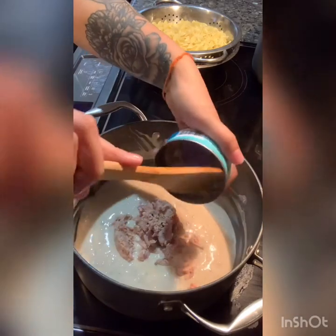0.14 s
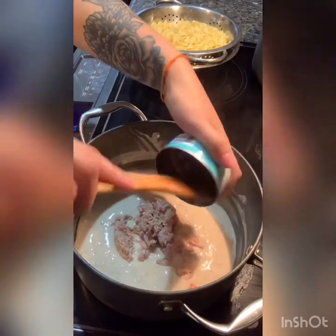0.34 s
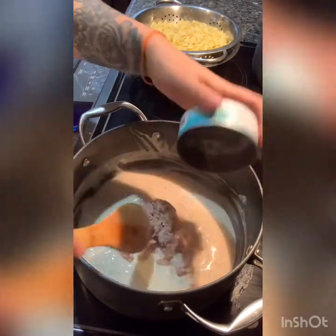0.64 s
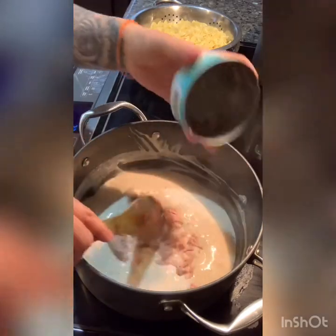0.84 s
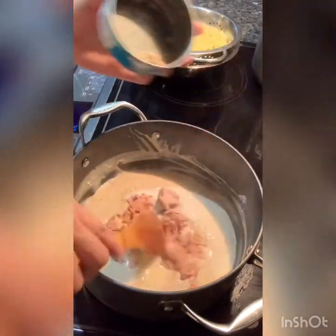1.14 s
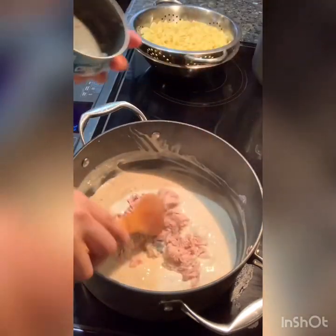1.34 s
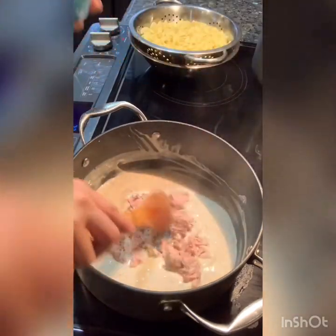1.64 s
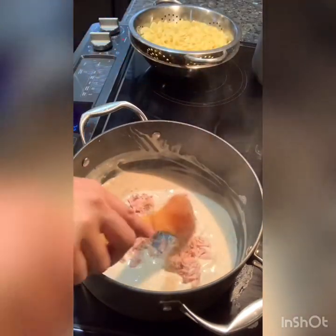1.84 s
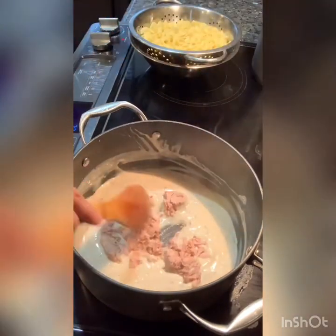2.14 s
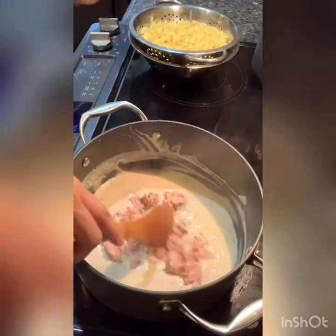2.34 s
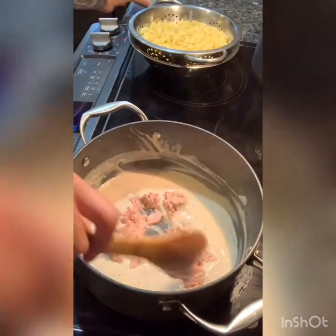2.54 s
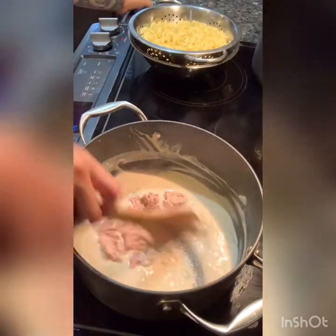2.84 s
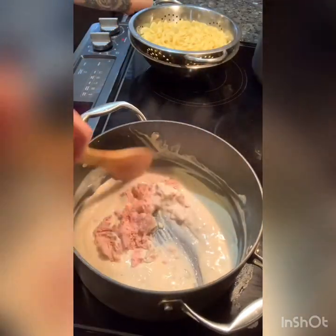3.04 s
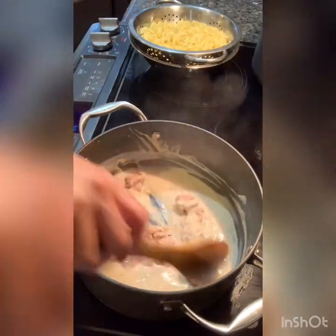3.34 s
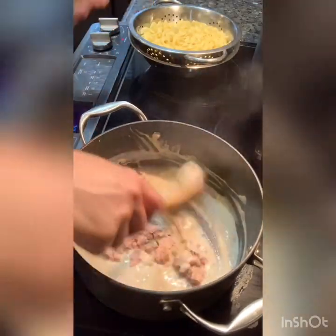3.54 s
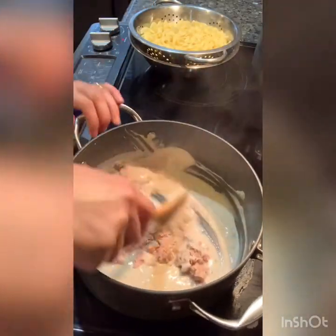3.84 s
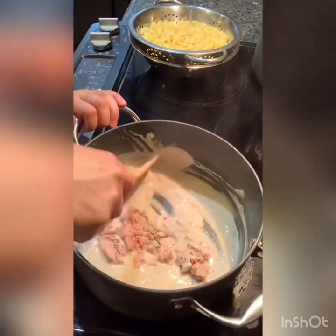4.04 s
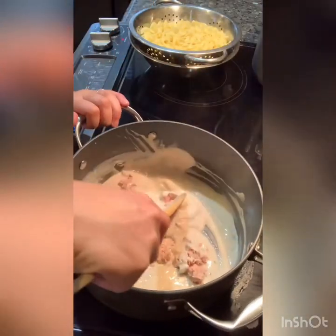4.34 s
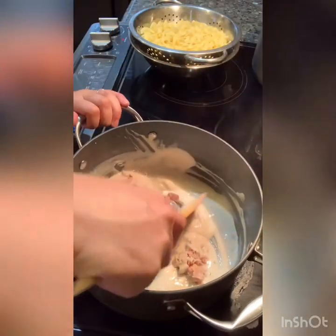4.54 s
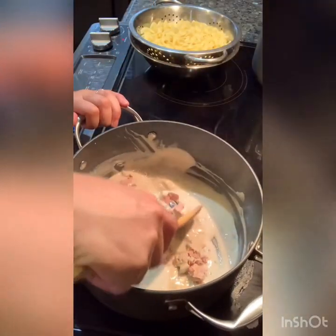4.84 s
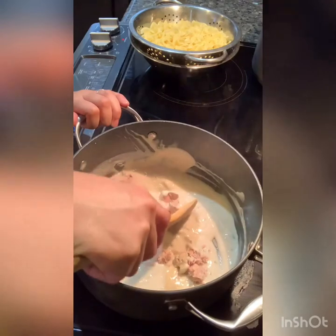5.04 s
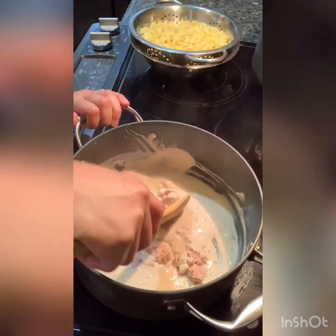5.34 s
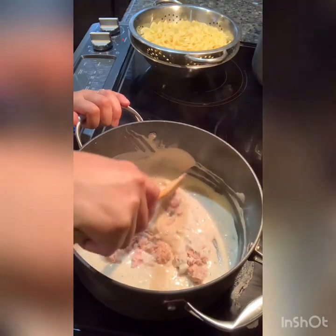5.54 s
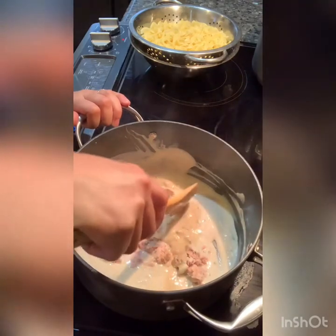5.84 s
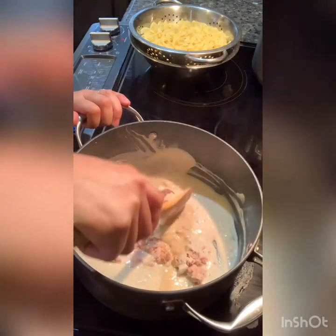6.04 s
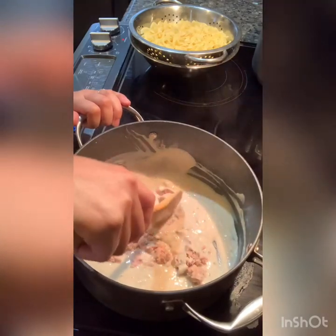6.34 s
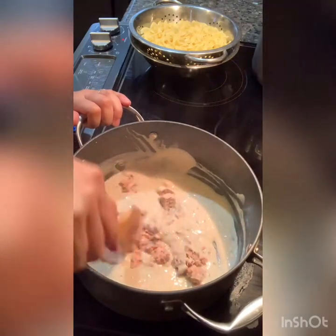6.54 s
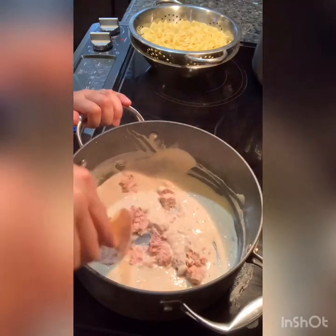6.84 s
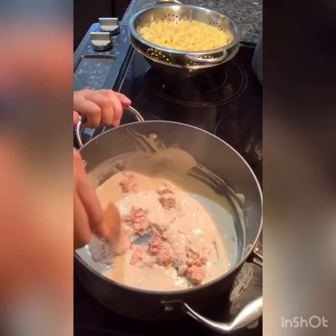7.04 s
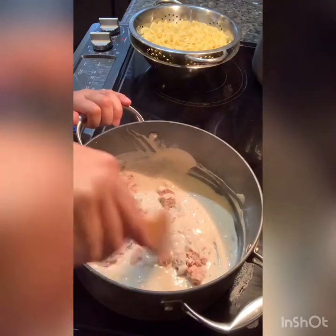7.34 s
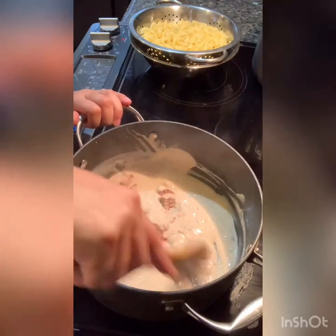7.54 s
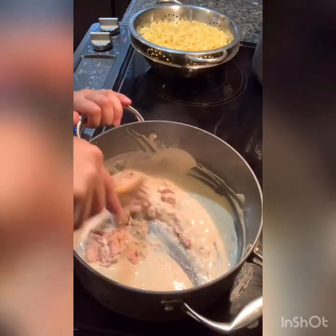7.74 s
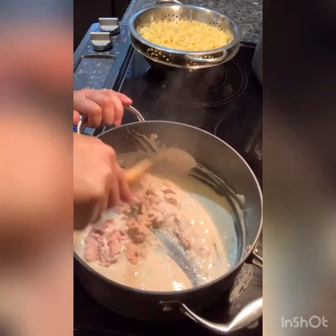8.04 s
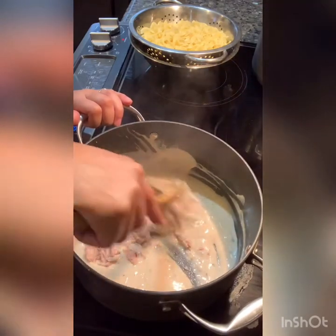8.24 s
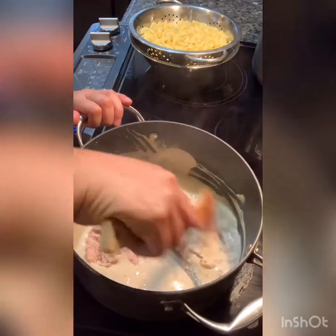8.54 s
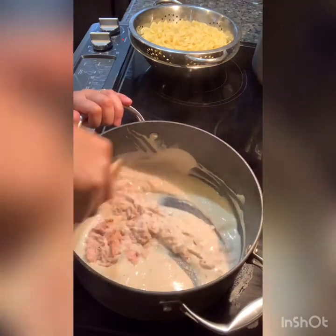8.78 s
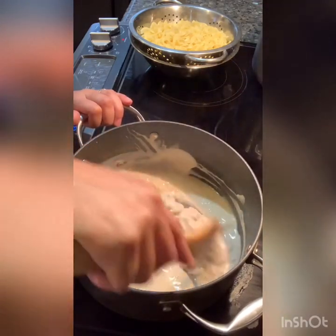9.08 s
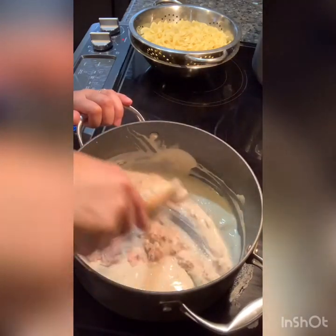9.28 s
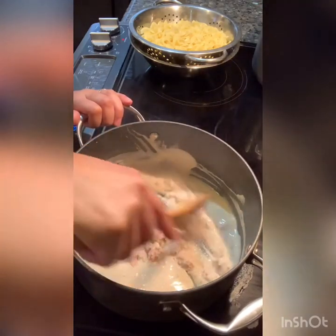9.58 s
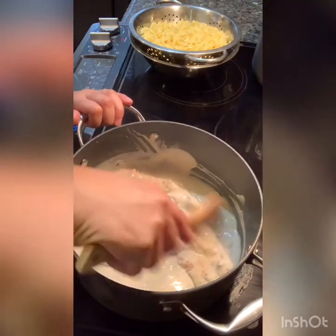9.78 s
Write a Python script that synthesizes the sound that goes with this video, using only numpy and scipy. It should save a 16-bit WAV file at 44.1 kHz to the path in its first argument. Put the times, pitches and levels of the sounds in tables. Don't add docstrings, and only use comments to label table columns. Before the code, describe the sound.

Dull woody chops ring briefly in a sauce-filled steel pot, with wet scraping strokes, a small tin clattering down, and faint spitting fat.

```python
import sys
import numpy as np
from scipy import signal
from scipy.fft import rfft, irfft, next_fast_len
from scipy.io import wavfile

SR = 44100
rng = np.random.default_rng(int(sys.argv[2]) if len(sys.argv) > 2 else 0)


def to_wav(sig):
    pcm = np.clip(np.atleast_2d(sig), -1, 1) * 32767
    pcm = np.round(pcm).astype(np.int16)
    wavfile.write(sys.argv[1], SR, pcm.T)


def volts_from_db(level):
    exponent = np.asarray(level, float) / 20
    return 10 ** exponent


N = 437031

# (time [s], blow [dB], hollow body [dB], wooden edge [dB], steel crack [dB])
CHOPS = [(1.013, -14, -0.5, -7.5, -43), (1.281, -13, -1, -2, -20), (1.541, -11.5, -5.5, 1.5, 0),
         (2.643, -31, 0, -19.5, -27), (3.025, -16.5, -10.5, -11.5, -18.5), (3.348, -16.5, -6, -13.5, -23.5),
         (3.728, -13, -11, 0, -4.5), (4.642, -22, 0.5, 2, -12), (5.201, -19.5, -0.5, -3.5, -10),
         (5.522, -17, 0.5, 1.5, 1), (5.867, -31, 7, -42, -11), (6.212, -17.5, -1.5, -5, -12),
         (6.518, -41.5, 13.5, -24.5, -19), (8.768, -27, -3, -17, -48), (9.099, -32.5, -4.5, -11.5, -18),
         (9.676, -22, -5, -12, -28)]
CHOP_PLACE = [0, 0, 0, 2, 2, 2, 0, 1, 1, 1, 1, 1, 1, 2, 1, 2]
# (decay scale of the modes, shortened by their damping [s], wooden crack [share], spray under the
# blow [dB], drag under the blow [dB])
PLACES = [(0.046, 13, -34.5, -26), (0.089, 7.3, -32, -25.5), (0.05, 0.55, -49, -27)]
# (pitch [Hz], level relative to the blow [dB], crack
# centre [Hz])
SPOON = [(1112, -2.5, 1400), (790, -3.5, 1300), (747, 0.5, 3400), (850, 3.5, 5500), (1296, 0, 3000),
         (992, -3.5, 4900), (1000.4, 0, 5130), (755, 7, 4000), (633, -0.5, 2800), (656, -5.5, 5630),
         (710, 10.5, 2800), (630, 2, 2600), (673, 12.5, 5500), (1320, -1.5, 4100), (628, 10.5, 5700),
         (884, 1.5, 3400)]
# (time [s], blow [dB], hollow body [dB], steel crack [dB])
TAPS = [(.058, -49, -11, -10), (.09, -53.5, -6, -17), (.215, -61.5, 3, -17), (.352, -45, 2, -27),
        (0.362, -43, 2, -19), (0.404, -36, -5, -12.5), (2.132, -52.5, 6, -7.5), (3.556, -28.5, -37, -10),
        (3.708, -42.5, -8, -12.5), (4.293, -63, 27.5, -7.5), (6.652, -57, 7, -8.5), (7.129, -49, 2.5, -13),
        (7.217, -53, 4, -7), (7.309, -54.5, -8, -8), (7.578, -45.5, -1, -15.5), (7.774, -46, 12, -10),
        (7.847, -47.5, -7, -13.5), (8.609, -44.5, -3, -26)]
# (pitch [Hz], through the meat [dB], in the middle [dB], near the wall [dB])
BOTTOM = [(384, -7, -6.5, -9.5), (418.4, 0.5, -1, -9), (493.2, -10, -9, -4.5), (549.3, -14, -12, -4),
          (671.5, 0, -3, 2), (801, -4.5, -6.5, -2), (1026, 1.5, -3, 4), (1104, -4.5, -20, -8),
          (1479, -3, -24, 1), (1594, -9, -19, 1), (1744, -2, -4, 0), (1875, 0, -6, -1)]
# (pitch [Hz], through the meat [dB], in the middle [dB], near the wall [dB])
WALL = [(2170, -3.5, -6.5, -4), (2474, -11.5, -6.5, -10), (2540, -12, -5, -16.5), (2749, -11, -1, -22),
        (2947, -3, -9, -14.5), (3385, 2, -2.5, -4.5), (3630, -0.5, -7.5, -7.5), (4190, -5.5, 2, -5.5),
        (4868, -8.5, -1.5, -8), (5800, -7.5, -9, -9), (6700, -14.5, -11, -11.5)]
COLOUR_EDGES_HZ = [610, 1270, 2860]
# (pitch [Hz], time to fall 60 dB [s],
# pitch held down by the spoon [share], through the meat [dB], in the middle [dB], near the wall [dB])
RIM = [(408, 0.38, .0, -33, -29, -34), (542, 0.39, 0.12, -33, -20, -30.5), (1011, .36, .0, -29, -20, -34.5),
       (1404, .3, 0.011, -35.5, -59, -29), (1830, .3, 0.0015, -37, -35.5, -38),
       (2390, 0.43, 0.0067, -40.5, -34.5, -43.5), (3390, .25, .0, -45, -49, -48)]
# (time [s], level [dB])
WORKTOP_HITS = [
    (1.032, -45.5),
    (1.3, -44),
    (2.601, -43.5),
    (2.659, -43),
    (3.37, -40),
    (3.75, -48),
]
# (start [s], length [s], wet swish [dB], scrape on steel [dB])
STROKES = [(0.0, 0.15, -76, -67), (0.105, 0.44, -68, -70), (0.464, 0.32, -105, -61.5),
           (0.678, 0.27, -64.5, -56.5), (1.632, 0.4, -61, -59), (2.109, 0.47, -78.5, -83.5),
           (2.543, 0.45, -66.5, -67), (3.044, 0.083, -40, -61), (3.34, 0.16, -48.5, -54),
           (3.915, 0.31, -66, -62.5), (4.15, 0.22, -72.5, -59), (4.865, .12, -77, -56),
           (5.338, 0.17, -68, -67.5), (5.749, 0.25, -60, -61), (6.29, 0.36, -66, -72),
           (6.65, 0.38, -73.5, -62.5), (6.909, 0.35, -79.5, -77), (7.422, 0.37, -68.5, -62.5),
           (7.774, 0.17, -59.5, -53.5), (8.072, 0.31, -74, -68.5), (8.405, 0.28, -62, -53),
           (8.608, 0.15, -72, -72), (8.738, 0.18, -61, -62.5), (9.063, 0.15, -56, -71),
           (9.386, 0.095, -55.5, -72), (9.628, 0.21, -64, -62.5)]
# (pitch [Hz], level per Hz [dB])
SCRAPE_COLOUR = [(250, -16.5), (420, -6.5), (700, -4.5), (1030, 0), (1400, 2.5), (1900, -10.5), (2600, -26),
                 (4000, -11.5)]
# (start [s], length [s], level [dB], pitch [Hz], time to fall 60 dB [s])
RUBS = [(.01, 0.15, -61, 1700, 0.018), (0.2, 0.11, -64, 1030, 0.025), (0.059, 0.065, -70, 3450, 0.034),
        (0.305, 0.27, -64.5, 1600, .011), (.72, 0.15, -68, 1910, 0.048), (4.136, 0.39, -72, 1440, .05),
        (4.217, 0.16, -72, 2380, 0.035), (4.398, .2, -87.5, 2680, 0.068),
        (4.902, 0.068, -58.5, 2060, 0.0066), (6.678, 0.21, -64, 1750, 0.0064),
        (7.4, 0.087, -67, 4705, 0.0074), (7.58, 0.1, -67, 4290, 0.0055), (8.44, 0.13, -66, 3900, .006),
        (8.66, 0.14, -69.5, 4390, 0.0044), (9.1, 0.24, -61.5, 550, 0.054)]
# (time [s], peak [dB])
TIN_HITS = [
    (2.551, -40),
    (2.5638, -25.5),
    (2.5739, -26.5),
    (2.763, -48.5),
    (2.812, -52),
    (2.839, -51.5),
]
# (pitch [Hz], level [dB], time to fall 60 dB [s])
TIN_MODES = [(850, -11.5, 0.16), (1199, -3, 0.3), (1280, -3.5, 0.2), (1500, -9.5, 0.78),
             (1770, -12.5, 0.18), (2250, -14, 0.47), (2630, -28.5, .2), (3380, -12, 0.44),
             (4300, -20.5, 0.52), (5600, -19, 0.43), (5770, -20.5, 0.99)]
# (time [s], level [dB], pitch [Hz], time to fall 60 dB [s])
TIN_BASE = [
    (2.562, -32, 1080, .03),
    (2.573, -32.5, 607, 0.029),
    (2.572, -29.5, 1540, .04),
]
# (pitch [Hz], level [dB], time to fall 60 dB [s])
OPENING = [(389, -35, 0.2), (566, -42.5, 0.075), (1030, -44.5, 0.14), (1670, -40, 0.095), (2560, -55, .08)]
# (time [s], peak [dB], pitch [Hz])
SNAPS = [(0.0014, -45, 3840), (0.5824, -60, 3810), (1.9794, -66, 5010), (2.2914, -66, 3860),
         (2.3248, -75, 3720), (2.9666, -44, 4360), (3.5542, -38, 7210), (4.134, -65, 3850),
         (4.4188, -65.5, 4500), (4.593, -66.5, 5740), (4.762, -49.5, 5530), (4.9123, -52, 4280),
         (5.4778, -50, 5110), (5.7682, -49, 6670), (5.839, -46, 5930), (6.4965, -58, 6280),
         (7.0645, -44, 5960), (7.515, -47.5, 4560), (7.5928, -35, 6570), (7.9243, -48, 7380),
         (8.1392, -49, 5870), (8.1783, -51.5, 3630), (8.4095, -49, 6900), (8.8752, -48.5, 6300),
         (8.9235, -53.5, 6650), (9.1754, -52, 3750), (9.2599, -57, 6300), (9.4688, -58.5, 6580),
         (9.5906, -60.5, 5560), (9.8053, -46.5, 6800)]
# (time [s], peak [dB], pitch [Hz])
SQUELCHES = [(0.628, -49, 3610), (0.7, -48, 3800), (0.7172, -41.5, 3900), (1.054, -34, 3600),
             (2.8643, -56, 5740), (2.9926, -46.5, 2480), (3.107, -45, 3740), (3.1536, -49, 4120),
             (4.2287, -55, 4540), (4.8827, -52.5, 5790), (4.9253, -46.5, 4250), (5.0573, -53.5, 4330),
             (5.9697, -56, 4440), (6.059, -57.5, 3980), (6.107, -59.5, 3830), (6.1468, -61, 3150),
             (7.43, -56, 4560), (7.8428, -50.5, 3430), (7.8665, -52, 5520), (8.1924, -45, 3710),
             (8.2128, -53, 3650), (8.4988, -60, 4520), (8.5443, -49.5, 4640), (8.8252, -44.5, 5070),
             (9.1244, -51, 4460), (9.4143, -59, 3990), (9.5251, -57, 4020), (9.7088, -47.5, 3920),
             (9.838, -44, 3980)]
# (time [s], peak [dB])
SPITS = [(0.2608, -50.5), (0.6911, -43), (1.0081, -38.5), (1.054, -36.5), (1.282, -34), (1.3648, -45),
         (1.5419, -33.5), (1.9804, -51), (2.1316, -58), (2.2926, -51), (2.5611, -31), (2.8638, -46),
         (2.9659, -38), (2.9926, -44), (3.023, -56), (3.0587, -43), (3.3493, -53.5), (3.3987, -48),
         (3.5553, -30), (3.708, -49), (3.7286, -39), (4.2297, -52), (4.4134, -52.5), (4.597, -50.5),
         (4.9132, -42.5), (5.1537, -60.5), (5.1763, -51), (5.5212, -32.5), (5.7698, -49), (5.8396, -48),
         (5.8617, -40), (6.1474, -44), (6.2078, -32.5), (6.4974, -40.5), (6.5899, -51.5), (6.622, -53.5),
         (6.756, -47.5), (7.0614, -48.5), (7.423, -53.5), (7.4879, -56.5), (7.5168, -38), (7.6197, -44),
         (8.1289, -53), (8.1621, -42), (8.1778, -35.5), (8.2496, -63), (8.5789, -51), (8.6577, -59),
         (8.869, -42.5), (8.9366, -52.5), (9.0379, -55.5), (9.0982, -54), (9.1768, -49.5), (9.3202, -53),
         (9.4647, -43.5), (9.5866, -52)]
# (time [s], level [dB])
BUMPS = [
    (2.565, -51),
    (3.847, -34),
    (4.036, -46),
    (4.295, -42),
    (6.771, -42),
    (7.434, -32.5),
    (7.518, -46),
    (7.774, -35),
]
# (pitch [Hz], level [dB], time to fall 60 dB [s])
HOB_MODES = [(72.2, 5, 0.22), (90.5, -5.5, 0.3), (122, 7.5, 0.14), (145.2, -4, 0.31)]
# (start [s], length [s], level [dB])
SIZZLES = [(0.053, 0.18, -78), (0.268, 0.16, -65), (0.685, 0.17, -72.5), (0.963, 0.11, -71.5),
           (1.186, 0.26, -77), (1.619, 0.31, -69), (2.14, 0.19, -75), (2.524, 0.4, -76),
           (3.021, 0.15, -71.5), (3.335, 0.16, -75), (3.933, 0.17, -73.5), (4.225, 0.071, -78.5),
           (4.41, 0.0386, -92.5), (4.597, 0.037, -85), (4.907, 0.058, -71), (5.179, 0.044, -61),
           (5.578, 0.074, -80), (5.764, 0.14, -79), (6.113, 0.14, -86), (6.3, 0.31, -78.5),
           (6.72, 0.39, -87.5), (7.417, 0.29, -80), (7.746, 0.2, -77.5), (8.116, 0.031, -83.5),
           (8.481, 0.14, -84), (8.74, 0.25, -83), (9.075, 0.21, -103), (9.435, 0.089, -81.5),
           (9.677, .18, -89)]
# (pitch [Hz], level per Hz [dB])
SIZZLE_COLOUR = [(5600, -14), (8000, -5.5), (11000, 4.5), (14000, -10), (16500, -6)]
# (pitch [Hz], level per Hz [dB])
SWISH_COLOUR = [(1400, -8.5), (2100, -6), (2800, -13), (3500, 0), (4500, -3), (5600, -4.5), (7500, -10)]
# (pitch [Hz], level per Hz [dB])
AIR_COLOUR = [(120, -30.5), (200, -4.5), (283, -3.5), (354, -5.5), (442, -5), (696, -15), (1060, -20),
              (2500, -38), (3250, -64), (5500, -120)]
# (time [s], level [dB])
RUMBLE_LEVEL = [(0.0, -57), (.95, -57), (1.24, -60), (1.9, -53), (2.81, -54), (3.33, -57.5), (3.61, -50),
                (4.16, -55), (5.18, -57), (5.76, -51.5), (6.07, -57), (6.92, -53), (7.42, -55.5),
                (7.66, -52.5), (8.24, -55), (9.23, -53), (9.68, -56.5), (9.9, -52)]
# (pitch [Hz], width [Hz], level [dB])
RUMBLE_MODES = [(73, 15, 3.5), (85, 7.2, -11.5), (120.5, 11, 2), (137.1, 13, -10), (163, 5.6, -16.5),
                (258, 12, -13)]
# (pitch [Hz], time to fall 60 dB [s], level [dB])
ECHO = [(100.6, 0.44, -16.5), (395.8, 0.43, -10), (950, 0.3, -5), (1700, .36, -4.5), (2560, 0.33, -7),
        (3800, 0.38, -8.5), (6017, 0.3, -10), (14000, 0.99, -13.5)]
# (pitch [Hz], likeness [0-1])
LIKENESS = [(60, .985), (200, .85), (400, .5), (700, .1), (2400, .1), (4400, .6), (7800, .999),
            (11500, .999), (14000, .95)]
# (pitch [Hz], lead [radians])
PORT_PHASE = [(0, 0), (300, -.2), (1200, -1), (2500, -1.7), (4500, -1), (6400, -1.2), (7700, -1.9),
              (8700, -3.1), (11200, -3.2), (12600, -5.4), (14000, -6), (22050, -6.1)]
# (pitch [Hz], difference [dB])
PORT_BALANCE = [(100, 0), (280, 3.5), (500, 1.5), (1000, 0.3), (2000, 0), (5000, 0.66), (8500, 0.7)]


def rms_one(x):
    return x / np.sqrt(np.mean(x ** 2) + 1e-20)


def at_hz(points, hz):
    table = np.array(points)
    return np.interp(np.log(hz + 1e-9), np.log(table[:, 0] + 1e-9), table[:, 1])


def fade(t, t60):
    return volts_from_db(-60 * t / t60)


def onset(t, rise_s):
    return 1 - np.exp(-t / rise_s)


def band_pass(order, low, high, x):
    sos = signal.butter(order, [low, min(high, .45 * SR)], "band", fs=SR, output="sos")
    return signal.sosfilt(sos, x)


def drift(rate):
    r = np.exp(-80 * np.pi * rate / SR)
    white = rng.standard_normal(N // 40 + 2002)
    slow = signal.lfilter([1], [1, -2 * r, r * r], white)[2000:]
    return np.interp(np.arange(N) / 40, np.arange(len(slow)), rms_one(slow))


def ring(clicks, hz, t60):
    r = volts_from_db(-60 / (max(t60, .002) * SR))
    w = 2 * np.pi * hz / SR
    return signal.lfilter([0, np.sin(w)], [1, -2 * r * np.cos(w), r * r], clicks + 1e-18)


def clicks_at(seconds, db):
    out = np.zeros(N)
    at = (np.asarray(seconds) * SR).astype(int)
    np.add.at(out, np.clip(at, 0, N - 1), volts_from_db(db))
    return out


def swells(start, length, db, attack_s, release_s, rest_db):
    out, t = np.full(N, volts_from_db(rest_db)), np.arange(N) / SR
    for s, span, gain in zip(start, length, volts_from_db(db)):
        near = slice(int(s * SR), int((s + span) * SR))
        edge = np.minimum((t[near] - s) / attack_s, (s + span - t[near]) / release_s)
        out[near] += gain * np.sin(np.pi / 2 * np.clip(edge, 0, 1)) ** 2
    return out


def spread(pair, hz):
    alike = np.clip(at_hz(LIKENESS, hz), 0, 1)
    return np.sqrt(1 + alike) * pair[0] + np.sqrt(1 - alike) * pair[1] * [[1], [-1]]


def banded_noise(spectrum, patchy_db, speed):
    out, together = 0, drift(speed)
    lowest, highest = spectrum[0][0], spectrum[-1][0]
    edges = lowest * 2 ** np.arange(0, np.log2(highest / lowest) + .5, .5)
    white = rng.standard_normal((2, 2, N))
    for k, (low, high) in enumerate(zip(edges, edges[1:])):
        pair = band_pass(2, low, high, white[k % 2])
        hz = np.sqrt(low * high)
        flicker_db = patchy_db * (together + 1.3 * drift(speed))
        out = out + volts_from_db(at_hz(spectrum, hz) + flicker_db) * spread(pair, hz)
    return rms_one(out)


def knocks(press_s, lead_in_db):
    hz, *db = np.repeat(np.transpose(BOTTOM + WALL), 2, axis=1)
    group = np.searchsorted(COLOUR_EDGES_HZ, hz)
    lead = 1200
    out, t = np.zeros(N + 9000), np.arange(4000)[:, None] / SR
    time = t[:, 0]
    tap_edge_db = -6.5
    blows = CHOPS + [(s, blow, body, tap_edge_db, crack) for s, blow, body, crack in TAPS]
    places = CHOP_PLACE + [2] * len(TAPS)
    grips = SPOON + [(800, -30, 4000)] * len(TAPS)
    luck = rng.standard_normal((len(blows), 3, len(hz)))
    rise = 1 - np.exp(-(t / (press_s * (hz / 1000) ** -.35)) ** 2)
    damping = 2.5 + .6 * (hz / 1000 - 1.5)
    shapes = [rise * volts_from_db(-60 * t / place[0] * damping) for place in PLACES]

    white = rng.standard_normal((len(blows), len(t)))
    splinter = band_pass(2, 1500, 5500, white) * onset(time, 0.001) * fade(time, 0.032)
    wood = band_pass(2, 520, 1050, white[:, ::-1]) * onset(time, 0.0019) * fade(time, 0.07)
    dull = signal.butter(4, 2150, fs=SR, output="sos")
    swell = np.exp(np.arange(-lead, 0) / (.009 * SR))
    press = 1 - np.exp(-(time / press_s) ** 2)
    for row, place, grip, draws, noise, thump, grit in zip(blows, places, grips, luck, splinter, wood, white):
        s, blow_db, body_db, edge_db, crack_db = row
        spoon_hz, spoon_db, crack_hz = grip
        _, wooden_share, spray_db, _ = PLACES[place]
        strength, pitch, phase = draws
        cycles = hz * (1 + .009 * pitch) * t + .07 * phase
        partials = volts_from_db(db[place] + 1.3 * strength) * shapes[place] * np.sin(2 * np.pi * cycles)
        body, middle, edge, crack = [partials[:, group == g].sum(axis=1) for g in range(4)]
        body = body + 0.81 * thump
        middle = middle + 1.2 * thump
        edge = edge + wooden_share * signal.sosfilt(dull, noise)
        crack = band_pass(3, crack_hz * 0.69, crack_hz * 1.26, crack + 2.5 * noise)
        colours = zip([body_db, 0, edge_db, crack_db], [body, middle, edge, crack])
        hit = sum(volts_from_db(blow_db + c + 4.0) * part / np.abs(part).max() for c, part in colours)
        spray = np.diff(grit, 2, prepend=[0, 0])
        hit = hit + volts_from_db(blow_db + spray_db) * fade(time, 0.018) * spray
        knock = press * np.sin(2 * np.pi * spoon_hz * time)
        hit = hit + volts_from_db(blow_db + spoon_db + 5.5) * fade(time, 0.026) * knock
        at = int(s * SR)
        out[at + lead:at + lead + len(hit)] += hit
        lead_in = signal.fftconvolve(grit[:lead], hit[:150], "same") / np.sqrt(150)
        out[at:at + lead] += volts_from_db(lead_in_db) * swell * lead_in
    return signal.sosfilt(signal.butter(2, 240, "high", fs=SR, output="sos"), out[lead:lead + N])


def linger():
    out, t = np.zeros(N + SR), np.arange(SR // 3)[:, None] / SR
    lift_s = .04
    luck = rng.standard_normal((len(CHOPS), len(RIM), 2, 4))
    splits = np.array([.972, .991, 1.007, 1.028])
    for (s, blow_db, *_), place, draws in zip(CHOPS, CHOP_PLACE, luck):
        for (hz, t60, held, *db), (strength, pitch) in zip(RIM, draws):
            bent_time = t - held * lift_s * onset(t, lift_s)
            cycles = hz * splits * (1 + .006 * pitch) * bent_time
            level = volts_from_db(blow_db + db[place] + 2.0 * strength) * fade(t, t60)
            partials = level * np.sin(2 * np.pi * cycles + pitch) * onset(t, 0.013)
            out[int(s * SR):int(s * SR) + len(t)] += partials.sum(axis=1)
    return out[:N] + ring(clicks_at(*np.transpose(WORKTOP_HITS)), 150, 1.1)


def scrape(per_s):
    slips = (rng.random(N) < per_s / SR) * rng.standard_normal(N) * volts_from_db(2.8 * drift(25))
    modes = BOTTOM + WALL
    return rms_one(sum(volts_from_db(db + at_hz(SCRAPE_COLOUR, hz)) * ring(slips, hz, 0.0097) for hz, db, *_ in modes))


def drag():
    s, blow_db = np.transpose(CHOPS)[:2]
    drag_db = blow_db + np.array(PLACES)[CHOP_PLACE, 3]
    return signal.lfilter([1], [1, -volts_from_db(-60 / (0.66 * SR))], clicks_at(s, drag_db))


def rubs():
    out, white = np.zeros(N), rng.standard_normal((len(RUBS), SR))
    for (s, span, db, hz, t60), noise in zip(RUBS, white):
        at = int(s * SR)
        gain = swells([s], [span], [db], 0.2 * span, 0.5 * span, -140)[at:at + SR // 2]
        out[at:at + len(gain)] += gain * rms_one(ring(noise, hz, t60))[-len(gain):]
    return out


def tin():
    s, peak_db = np.transpose(TIN_HITS)
    out, near = np.zeros(N), slice(int(2.5 * SR), int(3.5 * SR))
    rattle = signal.lfilter([1], [1, -volts_from_db(-60 / (.07 * SR))], clicks_at(s, peak_db))
    rattle = (signal.lfilter([.02], [1, -.98], rattle) * rng.standard_normal(N))[near]
    splits = (.98, .992, .998, 1.004, 1.016)
    clink = sum(volts_from_db(db) * ring(rattle, hz * split, t60) for hz, db, t60 in TIN_MODES for split in splits)
    wash = band_pass(1, 700, 2500, rattle)
    out[near] = volts_from_db(-42.5) * clink + volts_from_db(3.5) * wash + volts_from_db(-27) * np.diff(rattle, prepend=0)
    landing_s, landing_db = s[1:2], peak_db[1]
    bright = ring(clicks_at(landing_s, landing_db - 7.0), 4240, 0.049)
    bright = bright + ring(clicks_at(landing_s, landing_db - 0.5), 5750, 0.041)
    base = sum(ring(clicks_at([at], [db]), hz, t60) for at, db, hz, t60 in TIN_BASE)
    return out + bright + base


def opening():
    out, t = np.zeros(N), np.arange(SR // 4) / SR
    sag_per_s, rough_db = 0.67, 5
    stutter = drift(48)[:len(OPENING) * len(t)].reshape(len(OPENING), -1)
    sagging_time = t - sag_per_s * t ** 2 / 2
    for (hz, db, t60), rough in zip(OPENING, stutter):
        out[:len(t)] += volts_from_db(db + rough_db * rough) * fade(t, t60) * np.sin(2 * np.pi * hz * sagging_time)
    return out


def ticks():
    out, t = np.zeros((2, N + 6000)), np.arange(6000) / SR
    spits = [(s, db, 10700) for s, db in SPITS]
    # (events, time to fall 60 dB [s], band width [ratio], share heard off the axis of the ports)
    kinds = [(SNAPS, .045, 1.35, .15), (SQUELCHES, .045, 1.3, .15), (spits, 0.013, 1.6, 0.39)]
    for rows, t60_s, wide, aside in kinds:
        for (s, peak_db, hz), white in zip(rows, rng.standard_normal((len(rows), len(t)))):
            t60 = t60_s * volts_from_db(white[1])
            skirt = volts_from_db(-15.0) * fade(t, 0.022) * np.diff(white, prepend=0)
            burst = band_pass(2, hz / wide, hz * wide, white) + skirt
            burst = burst * onset(t, t60 / 15) * fade(t, t60)
            burst = volts_from_db(peak_db) * burst / np.abs(burst).max()
            side = aside * np.sign(white[2])
            out[:, int(s * SR):int(s * SR) + len(t)] += burst * [[1], [side]]
    return out[:, :N]


def thuds():
    s, blow_db = np.transpose(CHOPS)[:2]
    chop_db = -30 + 0.09 * (blow_db - blow_db.mean())
    s, push_db = np.hstack([[s, chop_db], np.transpose(BUMPS)])
    luck = rng.standard_normal((len(s), len(HOB_MODES)))
    rings = sum(ring(clicks_at(s + 0.009, push_db + db - 10.0 + 3 * luck[:, k]), hz, t60)
                for k, (hz, db, t60) in enumerate(HOB_MODES))
    return signal.sosfilt(signal.butter(2, 210, fs=SR, output="sos"), rings)


def sizzle():
    gain = swells(*np.transpose(SIZZLES), attack_s=0.01, release_s=0.016, rest_db=-91)
    return gain * volts_from_db(13.0) * banded_noise(SIZZLE_COLOUR, patchy_db=2.0, speed=47)


def swish():
    start, length, swish_db, _ = np.transpose(STROKES)
    gain = swells(start, length, swish_db, attack_s=0.14, release_s=0.17, rest_db=-89.5)
    return gain * volts_from_db(3.0) * banded_noise(SWISH_COLOUR, patchy_db=2.6, speed=20)


def air():
    return volts_from_db(-61.5) * banded_noise(AIR_COLOUR, patchy_db=1.5, speed=8.1)


def rumble():
    white = rng.standard_normal((2, N))
    shake = sum(volts_from_db(db + 3.0 * drift(5)) * rms_one(ring(white, hz, 2.2 / width))
                for hz, width, db in RUMBLE_MODES)
    both = rms_one(shake[0] + volts_from_db(-25.0) * shake[1] * [[1], [-1]])
    s, db = np.transpose(RUMBLE_LEVEL)
    return volts_from_db(np.interp(np.arange(N) / SR, s, db) + 3.0) * both


def kitchen(x):
    t = np.arange(int(.7 * SR)) / SR
    white, tail = rng.standard_normal((2, len(t))), 0
    for hz in 110 * 2 ** np.arange(0, 7.5, .5):
        pair = band_pass(2, hz / 2 ** .25, hz * 2 ** .25, white)
        t60, db = at_hz(ECHO, hz), at_hz(np.array(ECHO)[:, ::2], hz)
        even = np.sqrt(t60 * SR / np.log(1e6))
        tail = tail + volts_from_db(db) * fade(t, t60) / even * spread(pair, hz)
    return signal.fftconvolve(x[None], tail * onset(t, 0.001))[:, :N]


def scene():
    start, length, _, scrape_db = np.transpose(STROKES)
    stirring = swells(start, length, scrape_db, attack_s=0.14, release_s=0.17, rest_db=-79.5)
    pot = knocks(press_s=0.0019, lead_in_db=-22.5) + (drag() + stirring) * scrape(per_s=2400)
    wet, off_axis = ticks()
    near = pot + rubs() + tin() + linger() + wet
    direct = volts_from_db(np.array([[-.4], [.4]])) * near
    sources = direct + opening() + off_axis * [[-1], [1]]
    return sources + kitchen(near) + sizzle() + swish() + air() + thuds() + rumble()


def low_pass(x):
    return signal.sosfilt(signal.butter(12, 16640, fs=SR, output="sos"), x)


def record(dry):
    size = next_fast_len(N + 4096)
    hz = np.arange(size // 2 + 1) * SR / size
    lead = np.interp(hz, *np.transpose(PORT_PHASE))
    tilt = volts_from_db(at_hz(PORT_BALANCE, hz) / 2) * np.exp(.5j * lead)
    ports = irfft(rfft(dry, size) * [tilt, 1 / tilt], size)[:, :N]
    ports = signal.sosfilt(signal.butter(4, 48, "high", fs=SR, output="sos"), ports)
    ceiling = 1.5
    ports = ceiling * np.tanh(ports / ceiling)
    ports = signal.sosfilt(signal.cheby2(12, 35, 16400, fs=SR, output="sos"), ports)
    return low_pass(ports)


dry = scene()
out = record(dry)
to_wav(out)
```